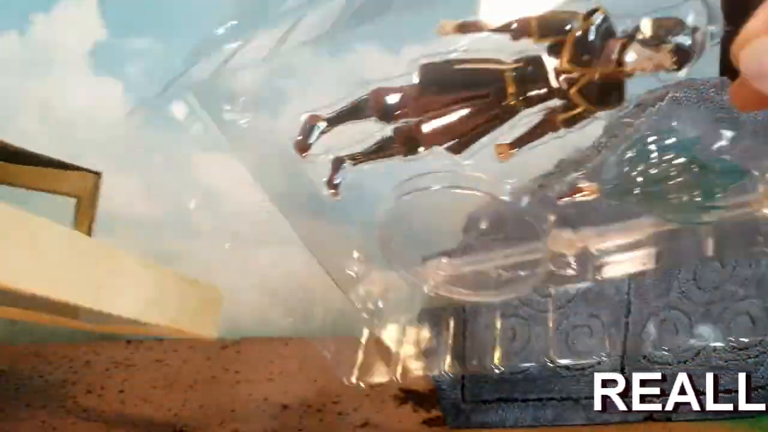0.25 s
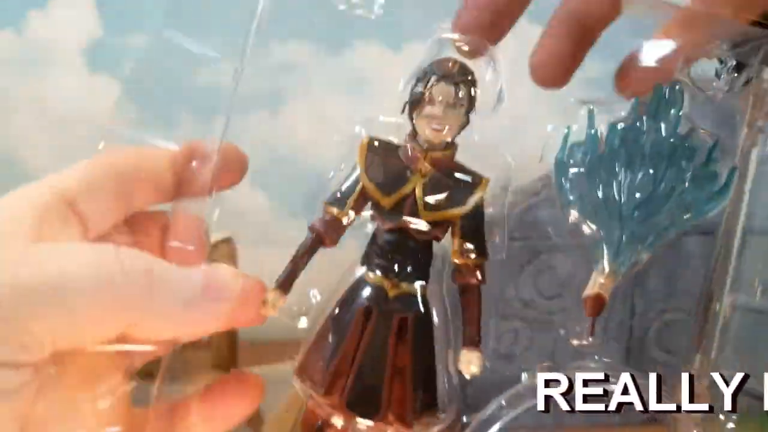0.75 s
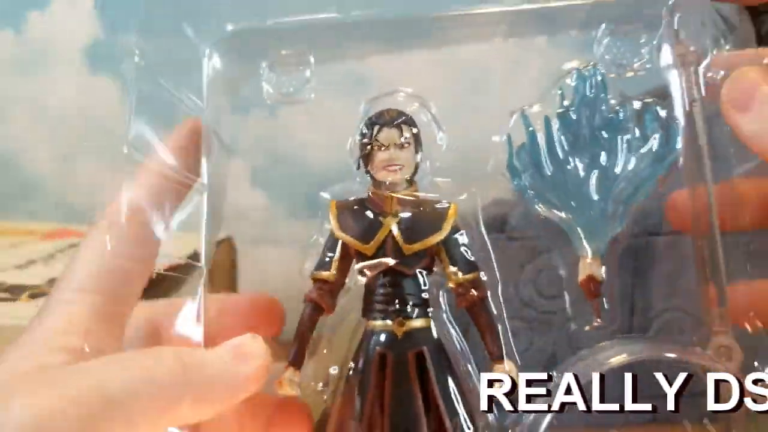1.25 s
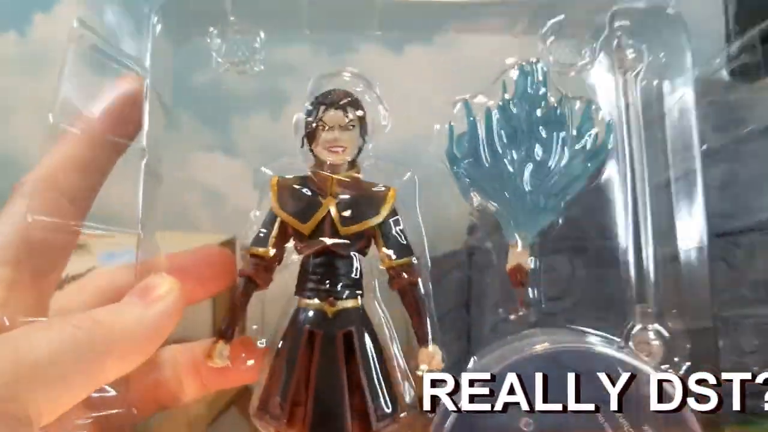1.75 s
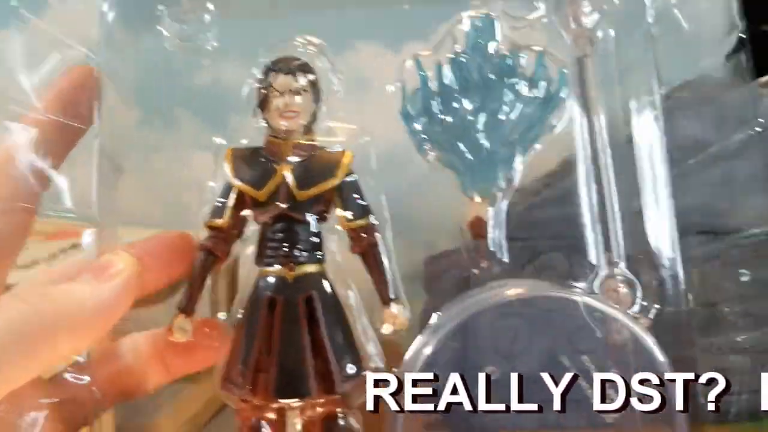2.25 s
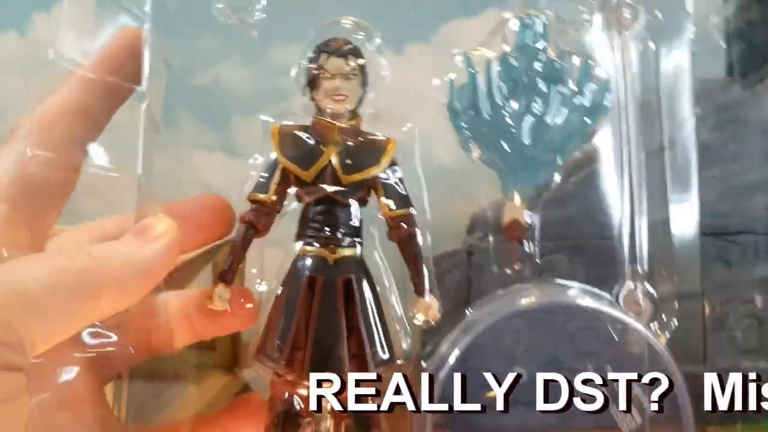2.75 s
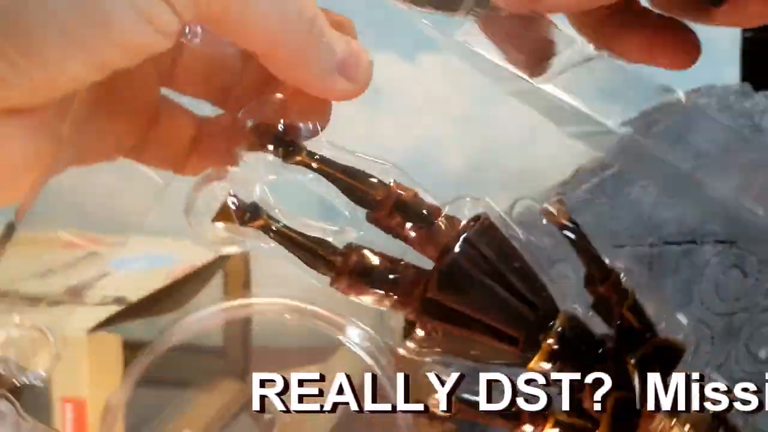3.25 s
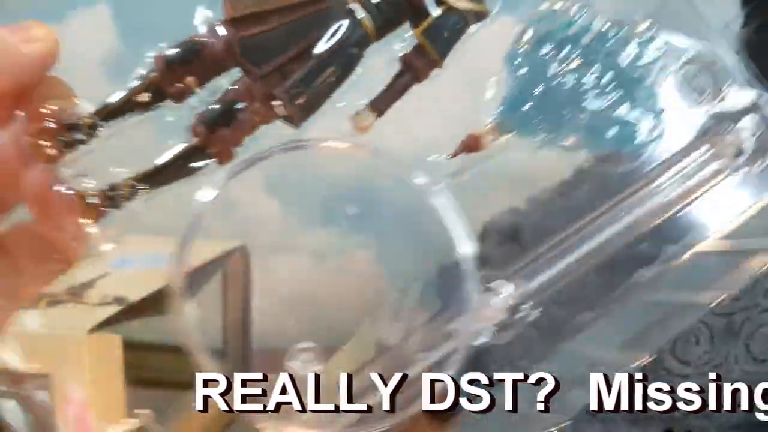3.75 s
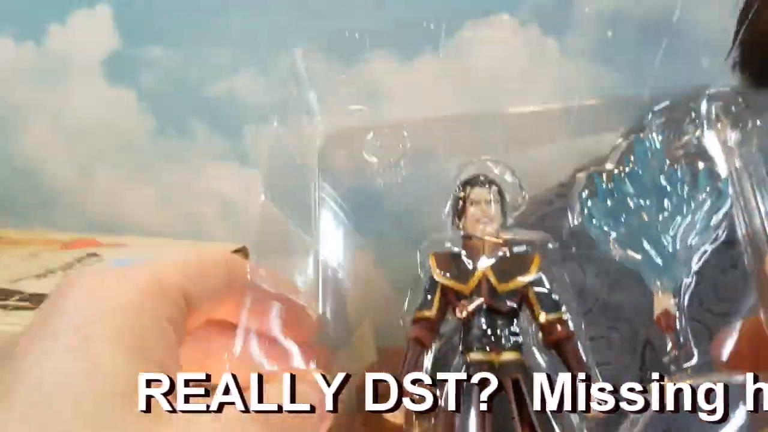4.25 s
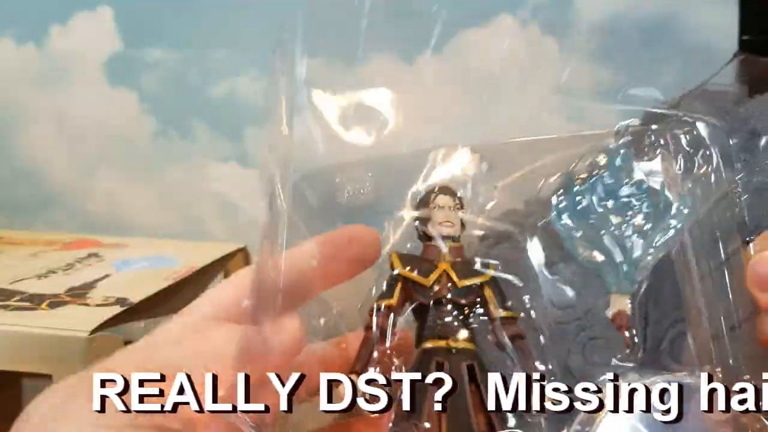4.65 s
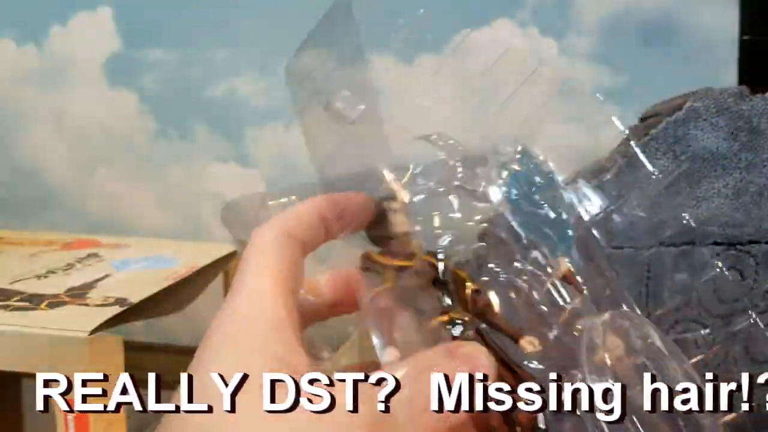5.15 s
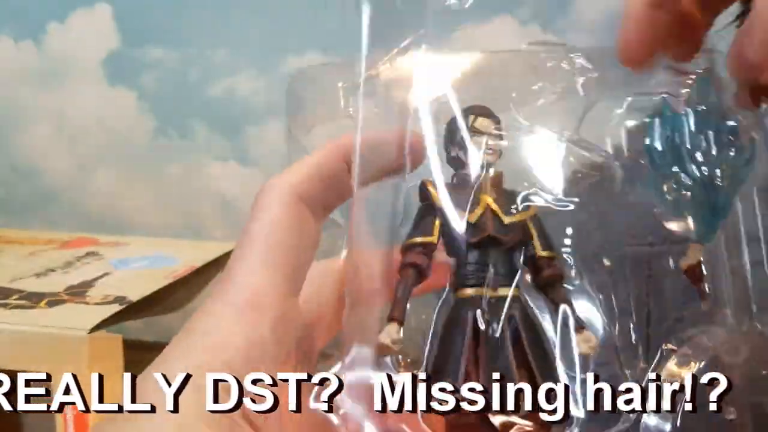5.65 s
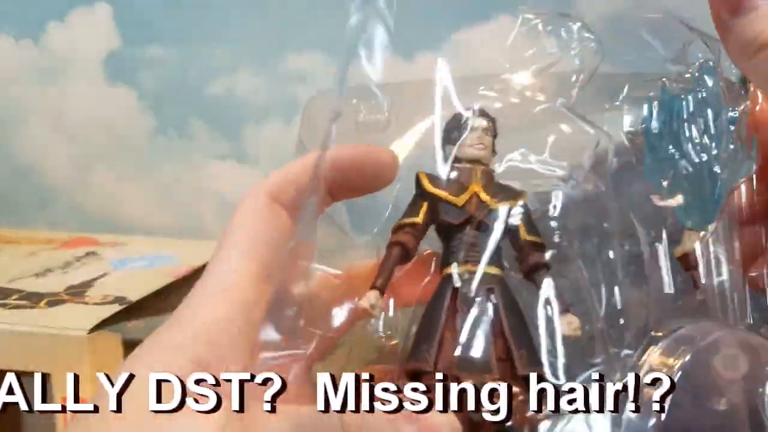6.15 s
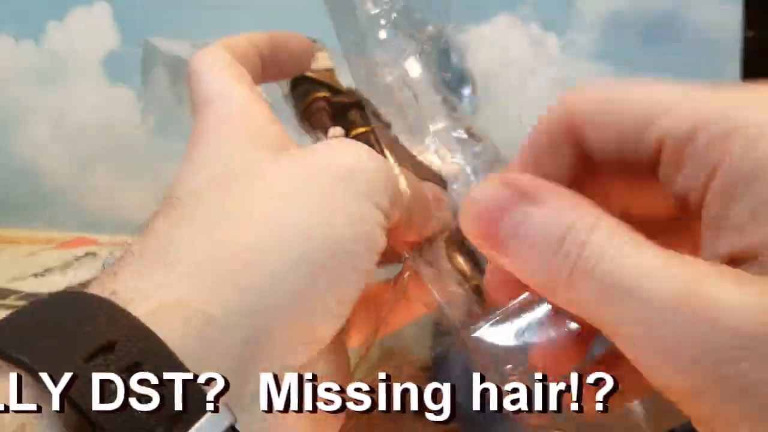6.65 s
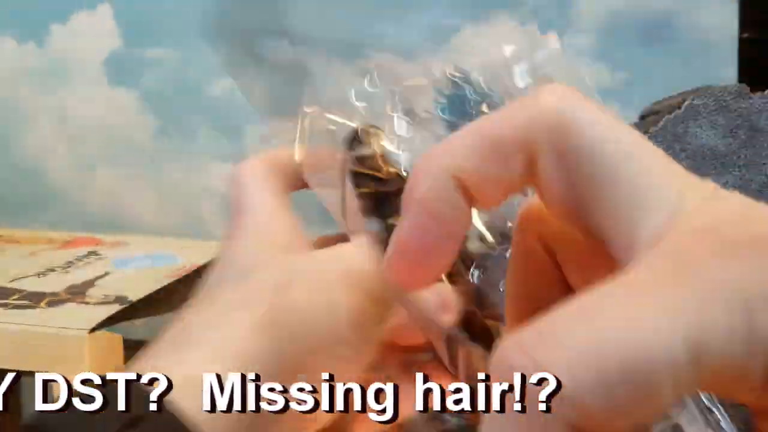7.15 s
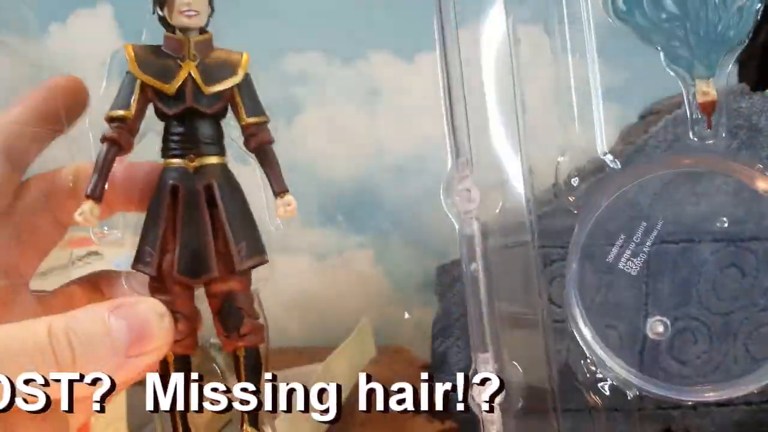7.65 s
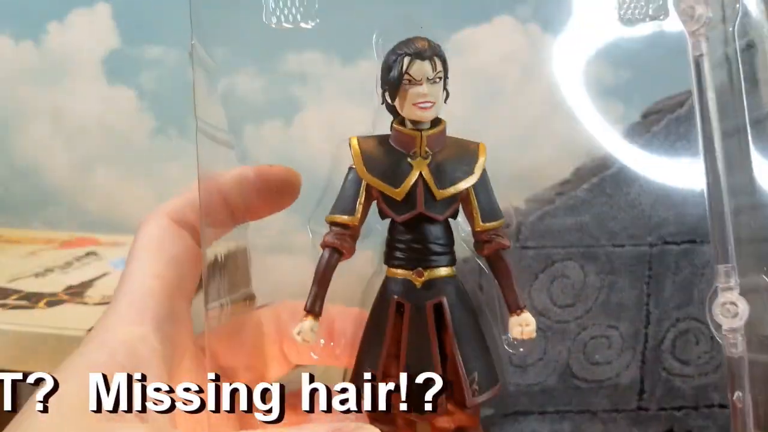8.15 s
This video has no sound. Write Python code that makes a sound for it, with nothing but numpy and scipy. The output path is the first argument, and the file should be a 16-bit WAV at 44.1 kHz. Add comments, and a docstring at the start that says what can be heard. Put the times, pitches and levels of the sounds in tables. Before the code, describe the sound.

Close, sharp snaps and dense crinkling from a thin plastic tray being bent and handled, with a fan humming softly behind.

```python
"""Flexing a plastic tray

Hands flex a clear moulded plastic tray close to a two-port microphone in a small room. Creases in the
stiff film buckle, and each impulse excites damped panel modes: sharp snaps over a bed of small crackles
and finger rub. A lid edge slips once in a run of jerks, and a finger slides near the end.
A fan hums behind, and the room answers briefly."""
import sys
import numpy as np
from scipy import signal
from scipy.fft import rfft, irfft, next_fast_len
from scipy.io import wavfile
from scipy.ndimage import uniform_filter1d, map_coordinates

SR = 44100
rng = np.random.default_rng(int(sys.argv[2]) if len(sys.argv) > 2 else 0)


def dump(signal):
    """Clip the signal to [-1, 1] and save it as 16-bit WAV at the path in sys.argv[1]."""
    limited = np.clip(np.atleast_2d(signal).T, -1, 1)
    pcm = np.round(limited * 32767).astype(np.int16)
    wavfile.write(sys.argv[1], SR, pcm)


N = 370440

# Wavering level of the fan: time_s, level_db
FAN_LEVEL = [(0.0, -42.5), (2.15, -41.5), (2.62, -47), (3.11, -42), (4.23, -43.5), (4.54, -40.5),
             (5.94, -44.5), (6.57, -50.5), (7.09, -44.5), (7.86, -45), (8.02, -42), (8.4, -40.5)]
# Relative noise spectra: frequency_hz, density_db
AIR_SPECTRUM = [(30, -27.5), (90, -28), (125, -10.5), (220, -14.5), (320, 3.5), (420, -10), (680, -21.5),
                (1100, -16.5), (1400, -25), (2400, -31.5), (3100, -26), (3800, -31.5), (4500, -28.5),
                (5700, -53), (7400, -36), (9700, -34), (12000, -31.5), (16000, -42)]  # fan air and microphone hiss
SKIN_SPECTRUM = [(400, -14), (1000, 1), (2200, -13.5), (4500, -13.5), (14000, -21)]  # smooth rubbing
SMALL_PANEL_SPECTRUM = [(500, -71), (1200, -19), (1650, -4), (2300, -4), (3500, 0), (5000, -5.5),
                        (7000, -18)]
LARGE_PANEL_SPECTRUM = [(120, -13), (250, 5.5), (500, -2.5), (1000, 3), (1400, -5.5), (2500, -35.5)]
CREASE_SPECTRUM = [(3000, -77), (5000, -14), (6500, 1.5), (9000, 0), (11000, -4.5), (15000, -6.5),
                   (16500, -12)]
# Likeness of the left and right channels: frequency_hz, correlation
AIR_COHERENCE = [(60, 0.87), (240, 1), (950, 0.96), (3770, 0.1), (15000, 0.0092)]
FILM_COHERENCE = [(60, 0.85), (240, 0.84), (950, 1), (3770, 0.72), (15000, 0.0057)]
# Reverberation time of the room: frequency_hz, t60_s
ROOM_DECAY = [(300, 0.028), (2000, 0.1), (10000, 0.016)]
# A finger sliding on the tray: time_s, level_db
SLIDE_LEVEL = [(7.86, -75), (7.885, -46), (7.96, -36.5), (8.01, -49), (8.05, -99)]
# Bursts of crackle, one per flex; the last two columns are relative to the small panels:
# start_s, length_s, level_db, crease_db, large_panel_db
FLEXES = [(0, 0.039, -41, -2, 0), (0.062, 0.078, -37, -4.5, 3.5), (0.239, 0.12, -47, 2.5, 3.5),
          (0.398, 0.1, -41.5, -7.5, 1), (0.542, 0.044, -34, -5, -0.5), (0.664, 0.077, -37, -8, -5),
          (0.741, 0.33, -44, -5.5, -2.5), (1.139, 0.053, -40.5, -3.5, -4.5), (1.221, 0.06, -36, -8, -3),
          (1.331, 0.12, -35, -4.5, -7), (1.526, 0.22, -40, -5.5, -2.5), (1.844, 0.056, -55, 8.5, 5),
          (2.11, 0.097, -65, 26, 9), (2.228, 0.0099, -60.5, 24, -14), (2.354, 0.086, -44, -4, -4.5),
          (2.513, 0.23, -51, 2.5, -1), (2.81, 0.093, -52.5, -13, 5.5), (2.886, 0.12, -35, -1.5, 1.5),
          (3.043, 0.11, -39, -3.5, 0), (3.146, 0.045, -35, 0.5, 4.5), (3.218, .12, -42.5, -8.5, 2),
          (3.438, 0.021, -31, -6, 0), (3.52, 0.13, -47.5, -5, -2.5), (3.713, 0.014, -45, -9, -3),
          (3.757, 0.031, -56, -1, 17), (3.873, 0.11, -34, -4.5, -1.5), (4.036, 0.2, -44.5, -3.5, -3.5),
          (4.307, 0.09, -37, -3, -3.5), (4.452, 0.1, -37, -3, -4), (4.578, 0.18, -37.5, -6.5, -6),
          (4.791, 0.23, -40, -8, -6.5), (5.042, 0.12, -31.5, -3.5, -10.5), (5.204, 0.31, -36.5, -5.5, -7.5),
          (5.548, 0.032, -36.5, -5, -2.5), (5.68, 0.092, -41.5, -6.5, 1), (5.792, 0.069, -30, -9, -4.5),
          (5.909, 0.25, -34, -4.5, -6), (6.182, 0.072, -31, -9, -7.5), (6.296, .2, -41, -5, -2.5),
          (6.611, 0.13, -46.5, -2.5, -8), (6.784, 0.08, -39.5, -0.5, -6.5),
          (6.932, 0.083, -34.5, -1, -11.5), (7.056, 0.15, -44.5, 0, -6), (7.196, 0.042, -30.5, -7, -8.5),
          (7.285, 0.016, -45.5, -7, 1), (7.33, 0.075, -52, -6, -3), (7.537, 0.046, -51, -4, 2)]
# Single buckling creases; thump and crack are gains within the snap:
# start_s, level_db, pitch_hz, thump_db, crack_hz, crack_db, left_over_right_db
SNAPS = [(0.0823, -17.5, 1020, -18, 5100, 1.5, 5), (0.123, -28, 1320, -13, 6450, -10, 0),
         (0.46, -25, 2500, -10, 4670, 0, 0), (0.485, -18.5, 1230, -6, 4610, -5, 2),
         (0.5154, -2.5, 2880, -8.5, 4460, -14, 3.5), (0.533, -22, 3350, -9, 6500, -6, 1.5),
         (0.56, -12.5, 1300, -3, 4770, -13, 3), (0.6614, -6.5, 1710, -24, 7350, -7, 2),
         (0.686, -15, 960, -18, 6700, -5, 0), (0.729, -24, 1520, -21, 4600, -2, 2.5),
         (0.745, -7.5, 1530, -27, 5860, 3, 3), (0.841, -32, 1180, -10, 5010, 6.5, 2.5),
         (0.912, -27, 1090, -15, 7100, 3, 5), (1.057, -29.5, 3510, -18, 4920, 6.5, 2.5),
         (1.0877, -39, 840, -13, 7500, 10, 3), (1.157, -19.5, 2570, -15, 4510, -3, 2),
         (1.213, -11, 2570, -25, 5910, -15, 1.5), (1.225, -15.5, 1020, -20, 5260, -12, 3),
         (1.269, -11.5, 3450, -22, 6500, -3, 2), (1.2733, -10, 915, -8, 5110, 0.5, 6),
         (1.278, -7.5, 860, -24, 4630, -0.5, 2), (1.4227, -21, 4200, -10, 6960, -2, 8),
         (1.693, -25, 700, -12, 5030, 0, 5), (1.768, -30.5, 950, -19, 5120, 8, 5),
         (1.843, -35, 620, -6, 6000, 0, 3), (1.935, -37, 2500, -8, 5510, -8, 7),
         (1.987, -36, 1060, -8, 4880, -2, 5), (2.229, -32.5, 610, -5, 9400, 11, -16),
         (2.341, -6, 810, -23, 6960, -4, 5), (2.406, -30, 3970, -15, 5010, -2, 6),
         (2.415, -28, 3400, -14, 6160, -1, 3.5), (2.43, -27.5, 3400, -12, 4580, 0, 2.5),
         (2.5801, -11, 876, -19, 4520, -3.5, 1.5), (2.617, -26.5, 2420, -15, 6000, 1, 2.5),
         (2.713, -44, 1130, -8, 4990, 4, 7), (2.887, -26, 790, -3, 4690, -3, 0),
         (2.953, -13, 990, -1.5, 5220, 1, 1.5), (2.982, -8.5, 1040, -10, 5750, -1, 0),
         (3.1482, -17.5, 3330, -10, 4660, 8, 4), (3.197, -15, 650, -7, 4600, -16, 1),
         (3.235, -17.5, 930, -8, 5590, -4, 2), (3.278, -15.5, 3430, -24, 5880, -6, -3),
         (3.361, -29.5, 3520, -12, 5350, 1, 6), (3.437, -13, 3360, -20, 5550, -16, 6),
         (3.4535, -0.5, 940, -15, 5100, -4, 3.5), (3.537, -26, 3130, 2, 5250, -7, 7),
         (3.5577, -18, 740, -19, 5770, -8, 6), (3.596, -30.5, 3750, -12, 4630, 5.5, 4.5),
         (3.669, -30, 1010, -16, 4800, -7, 8), (3.881, -12.5, 945, -21, 4660, -14, 2),
         (3.918, -11, 3720, -17, 5100, 4.5, 4), (3.9846, -14.5, 1680, -11.5, 6860, -11, 1),
         (4.0545, -22, 3540, -23, 4560, -2, 3), (4.0748, -27.5, 970, -21, 7520, 8.5, 3),
         (4.1635, -12.5, 3770, -21, 6050, -11, 2.5), (4.2017, -34, 3520, -12, 4510, 8, 1),
         (4.328, -18.5, 1080, -11, 4660, 1, 0), (4.455, -20, 2520, -16, 5500, -6, 0),
         (4.4666, -8, 1490, -8, 5250, -4, 0), (4.5157, -2, 1990, -12, 5800, -3, 0.5),
         (4.582, -18, 1070, -13, 4530, -7, 1.5), (4.6085, -14, 1250, -26, 4680, -14, 0.5),
         (4.6714, -11.5, 3570, -28, 7000, 1.5, 3), (4.7003, -12, 990, -11, 5050, -3, 3),
         (4.747, -23, 1640, -5, 4590, 1, 1.5), (4.78, -18, 3640, -9, 4620, -11, 0),
         (4.8072, -28, 4500, -9, 6000, 4, 2), (4.816, -37, 3240, -12, 5500, 1, 1.5),
         (4.835, -22, 1890, -17, 7630, 5, 2), (4.9065, -38, 3620, -18, 5050, -5, 1),
         (4.9205, -14, 2030, -18, 4830, -11, 3), (4.944, -19, 940, -7, 5980, -10, 1),
         (5.0474, -19.5, 3020, -24, 6540, -3, 1), (5.0815, -6.5, 1750, -35, 5540, 2, 4.5),
         (5.129, -14, 1970, -28, 5000, -2, 0), (5.1577, -24, 3460, -24, 4540, -2, 3),
         (5.2005, -17.5, 1630, -13, 4530, -11, -3), (5.282, -13.5, 2140, -24, 4500, -16, -6),
         (5.3831, -7.5, 2260, -32, 7100, 2.5, 0), (5.414, -23, 3470, -18, 5490, -2, -5),
         (5.4328, -12.5, 3640, -29, 4550, -18, 3), (5.546, -23, 3950, -13, 4590, 0, 0),
         (5.565, -1.5, 1790, -41, 4700, -5.5, 2.5), (5.579, -18.5, 2530, -18, 6900, 12, 2),
         (5.596, -11, 3700, -10, 5920, -1, -5), (5.71, -24, 1010, -10, 4700, -14, -6),
         (5.739, -23, 767, -15, 5160, 4.5, -6), (5.779, -24, 4020, -16, 11600, 3, 0),
         (5.798, -14, 935, -16, 4890, -11, -1), (5.804, -15, 3800, -20, 7420, -1, 0),
         (5.813, -17, 4100, -25, 4530, -5, 1), (5.8408, -21, 1980, -23, 8700, 5, 1.5),
         (5.846, -13.5, 3590, -24, 4630, -11, -1), (5.875, -22, 3700, -16, 4640, -4, -1.5),
         (5.917, -7, 4100, -15, 8350, -8, 4), (5.941, -19, 2800, -22, 4550, -3, -1),
         (6.034, -19, 3420, -14, 6500, -4, 3), (6.0467, -16, 4350, -21, 4500, -7, 2),
         (6.0527, -9, 2500, -23, 5690, -15, 2.5), (6.0699, -19.5, 1500, -20, 10900, 9, 1),
         (6.085, -11.5, 1570, -6, 5140, -3, 0.5), (6.1235, -23, 890, -14, 9000, 8, 0),
         (6.189, -9, 1020, -26, 6340, 5.5, -1.5), (6.203, -9, 3000, -30, 6000, 0, 2),
         (6.209, -11, 2300, -33, 4590, 0, -2), (6.232, -21, 1660, -22, 5490, 2, -3),
         (6.2454, -10, 2640, -31, 7380, -12, -1), (6.255, -14, 1690, -23, 5000, -14, 0),
         (6.275, -12, 3170, -28, 4900, 3, -2), (6.3709, -12.5, 1090, -11, 4660, -1.5, -4),
         (6.466, -19, 4420, -16, 4640, 3, 1), (6.684, -30, 3510, -24, 5980, -9, 8),
         (6.7685, -16.5, 3850, -31, 5150, 1, 6), (6.783, -32, 4130, -26, 10100, 11, 0),
         (6.79, -14, 1120, -31, 6430, 12.5, 5.5), (6.812, -25.5, 3600, -20, 8000, 16, 1),
         (6.8277, -21, 1940, -24, 10400, 11.5, 5), (6.835, -21, 3450, -20, 4760, -1, 9),
         (6.857, -21, 3440, -7, 4520, -3, 7), (6.946, -15.5, 3600, -33, 6440, 8, 6),
         (6.9654, -12, 1600, -25, 7160, -3, 9.5), (6.9947, -16, 3500, -30, 7300, 2, 10),
         (7.051, -28, 2550, -14, 6650, 8, 6), (7.0642, -19.5, 3500, -24, 11200, 10, 7),
         (7.0849, -20, 3880, -30, 6900, 6.5, 3), (7.128, -6, 3400, -30, 9100, 5, 5),
         (7.159, -22, 2000, -12, 8280, 3, -1), (7.1991, -10.5, 1600, -18, 8380, 6, 3),
         (7.2037, -6.5, 2170, -22, 5810, 1.5, 0), (7.209, -11, 1610, -23, 8430, -7, 6),
         (7.2341, -9, 2210, -30, 6200, 0, 0), (7.240, -15, 2450, -28, 6780, 1, 2),
         (7.333, -30, 4200, -16, 11200, 11, 2), (7.3652, -23, 3370, -6, 7800, 2, -1),
         (7.375, -22.5, 1590, -18, 6000, -8, 7), (7.405, -27.5, 1090, -21, 4640, -18, 0),
         (7.999, -20.5, 1750, -9, 6360, -8.5, 2.5)]


def amp(db):
    """Decibels to amplitude ratio."""
    return 10 ** (np.asarray(db) / 20)


def unit(x):
    """Normalisation to an rms of 1."""
    return x / np.sqrt(np.mean(x ** 2) + 1e-20)


def decay(t, t60_s):
    """Exponential damping: 60 dB down after t60_s."""
    return amp(-60 * t / t60_s)


def attack(t, rise_s=0.0001):
    """First-order rise with time constant rise_s."""
    return 1 - np.exp(-t / rise_s)


def along(points, hz):
    """Interpolation of (frequency_hz, value) points on a logarithmic frequency axis."""
    f, v = np.transpose(points)
    return np.interp(np.log(hz + 1), np.log(f + 1), v)


def curves(rows):
    """Linear interpolation, to every sample, of each column after the time."""
    time_s, *columns = np.transpose(rows)
    return [np.interp(np.arange(N) / SR, time_s, column) for column in columns]


def wobble(rate):
    """A smooth random curve through rate knots a second."""
    knots = rng.standard_normal(int(N * rate / SR) + 4)
    return map_coordinates(knots, [np.arange(N) * rate / SR])


def filtered(x, response):
    """Filtering as multiplication of the spectrum by response(hz)."""
    size = next_fast_len(N + 8192)
    return irfft(rfft(x, size) * response(np.fft.rfftfreq(size, 1 / SR)), size)[..., :N]


def band(x, lo_hz, hi_hz):
    """Causal band-pass filter."""
    return signal.sosfilt(signal.butter(2, (lo_hz, hi_hz), "band", fs=SR, output="sos"), x)


def spread(pair, spectrum, coherence):
    """Partial coherence: two independent signals, coloured and mixed as mid and side; rms 1."""
    def response(hz):
        angle = np.arccos(np.clip(along(coherence, hz), -1, 1)) / 2
        return amp(along(spectrum, hz)) * [np.cos(angle), np.sin(angle)]
    mid, side = filtered(pair, response)
    return unit(np.array([mid + side, mid - side]))


def fan(motor_hz=480):
    """Broadband air noise with a hump near 320 Hz, plus one faint, wavering motor tone."""
    level_db, = curves(FAN_LEVEL)
    air = spread(rng.standard_normal((2, N)), AIR_SPECTRUM, AIR_COHERENCE)
    phase = 2 * np.pi * motor_hz * np.arange(N) / SR + 0.5 * wobble(5)
    motor = amp(-10 + 1.5 * wobble(6)) * np.sin(phase)
    return amp(level_db) * (air + motor)


def room(x):
    """Reverberation: convolution with a noise tail in which each frequency decays at its own rate."""
    hz, t, spectra = signal.stft(rng.standard_normal((2, SR // 4)), SR, nperseg=128)
    tail = signal.istft(spectra * decay(t, along(ROOM_DECAY, hz)[:, None]), SR, nperseg=128)[1]
    delayed = np.pad(x, ((0, 0), (80, 0)))  # reflections arrive 1.8 ms late
    return signal.fftconvolve(delayed, tail / np.linalg.norm(tail[0]), axes=1)[:, :N]


def finger_slide():
    """Sliding friction: skin on smooth film gives an even hiss, strongest near 1 kHz."""
    level_db, = curves(SLIDE_LEVEL)
    return amp(level_db) * spread(rng.standard_normal((2, N)), SKIN_SPECTRUM, FILM_COHERENCE)


def lid_slips(start_s=1.319, mean_gap_s=0.0048, count=12):
    """Stick-slip friction: a lid edge moves in jerks, each a bright tick of a few milliseconds."""
    jerks, t = np.zeros(N), np.arange(SR // 100) / SR
    for k, (jitter, size) in enumerate(rng.standard_normal((count, 2))):
        onset = round((start_s + mean_gap_s * (k + 0.25 * jitter)) * SR)
        jerks[onset:][:len(t)] += amp(-17 + 3.6 * size) * decay(t, 0.0059)
    return band(jerks * rng.standard_normal((2, N)), lo_hz=2210, hi_hz=10100)


def handling(rise_db_per_s=1095, fall_db_per_s=344):
    """Incoherent addition: flex powers sum to a level and weight the crease and large-panel gains."""
    t = np.arange(0, N, 32) / SR
    start_s, length_s, level_db, *colours_db = np.transpose(FLEXES)[..., None]
    rise_db = rise_db_per_s * (start_s - t).clip(0)
    fall_db = fall_db_per_s * (t - start_s - length_s).clip(0)
    power = amp(level_db - rise_db - fall_db).clip(amp(-150)) ** 2
    rest_power, rest_colours_db = amp(-63) ** 2, (-8.5, 7)  # a tray that is only held barely stirs
    total = rest_power + power.sum(axis=0)
    mixed_db = [(rest_power * rest_db + (power * flex_db).sum(axis=0)) / total
                for rest_db, flex_db in zip(rest_colours_db, colours_db)]
    return curves(np.transpose([t, 10 * np.log10(total), *mixed_db]))


def shifting_resonances(x, depth_db):
    """Bending shifts the film's resonances, modelled as a random gain over time and frequency."""
    spectra = signal.stft(x, nperseg=256)[2]
    field = uniform_filter1d(rng.standard_normal(spectra.shape[1:]), size=4, axis=0)
    field = uniform_filter1d(field, size=12, axis=1)
    return signal.istft(spectra * amp(depth_db * unit(field)), nperseg=256)[1][:, :N]


def crackle():
    """Crackling noise: many small buckles of widely scattered size come in clumps, over finger rub."""
    level_db, crease_db, large_panel_db = handling()
    clumps = np.exp(0.35 * wobble(40))
    pops_per_s = 300 * amp(0.35 * (level_db + 41)) * clumps  # harder handling buckles more creases
    pops = (rng.random(N) < pops_per_s / SR) * amp(4.5 * rng.exponential(size=N).clip(0, 1.8))
    grip_db = 0.21 * (level_db + 38)  # a firmer grip rubs more; a light one leaves dry ticks
    rub = amp(-6 + grip_db + 4.3 * wobble(70))
    noise = shifting_resonances(rng.standard_normal((2, N)), depth_db=3.5)
    t = np.arange(SR // 50) / SR

    def layer(spectrum, t60_s):
        kicks = pops * amp(rng.normal(0, 3.5, N))  # every buckle has its own colour
        bursts = unit(signal.fftconvolve(kicks, decay(t, t60_s) * attack(t))[:N])
        drive = np.hypot(bursts, rub)
        local_power = np.abs(uniform_filter1d(drive ** 2, size=3000))
        drive /= local_power ** 0.4  # evened out, so that the hands set the energy spent
        return spread(drive * noise, spectrum, FILM_COHERENCE)

    small_panels = layer(SMALL_PANEL_SPECTRUM, t60_s=0.007)
    creases = amp(crease_db) * layer(CREASE_SPECTRUM, t60_s=0.0045)
    large_panels = amp(large_panel_db) * layer(LARGE_PANEL_SPECTRUM, t60_s=0.012)
    lean = amp([[0.7], [-0.7]])  # the tray is held a little to the left
    treble_lean = amp([[0.6], [-0.6]])  # treble is more directional
    return lean * amp(level_db) * (small_panels + treble_lean * creases + large_panels)


def panel_ring(t, pitch_hz):
    """Impulse response of a panel and 18 neighbouring modes; higher panels are damped sooner."""
    t60_s = 0.022 * (pitch_hz / 1000) ** -0.15
    scatter = (np.arange(18)[:, None] + rng.random((18, 1))) / 18 - 0.5
    neighbour_hz = np.sqrt(pitch_hz * 2200) * np.exp(2.1 * scatter)
    neighbours = np.sin(2 * np.pi * (neighbour_hz * t + 0.62 * rng.random((18, 1)))).sum(axis=0)
    modes = 0.35 * np.sin(2 * np.pi * pitch_hz * t) + 0.11 * neighbours
    blow = 1 + 0.73 * decay(t, 0.0013)  # the buckle itself is hard and brief
    return modes * blow * decay(t, t60_s) * attack(t)


def tray_thump(t):
    """Damped free vibration of two low modes of the tray."""
    modes_hz = rng.uniform((190, 380), (330, 560))[:, None]
    return np.sin(2 * np.pi * modes_hz * t).sum(axis=0) * decay(t, 0.031) * attack(t, 0.0033)


def crease_crack(t, crack_hz):
    """A brief blow has a broad spectrum: a burst of treble noise, then a weaker fizz."""
    noise = rng.standard_normal((3, len(t)))
    peak = band(noise, lo_hz=0.86 * crack_hz, hi_hz=min(1.3 * crack_hz, 16000))
    shared, *separate = peak + 0.4 * band(noise, lo_hz=4000, hi_hz=15500)
    lag = rng.choice((-2, -1, 2, 2))  # samples between arrivals at the two ports
    hiss = unit(np.array([shared, np.roll(shared, lag)]) + 0.48 * np.array(separate))
    blow, fizz = decay(t, 0.0045), amp(-14) * decay(t, 0.03)
    return hiss * (blow + fizz) * attack(t)


def snaps():
    """Snap-through buckling: each crease rings its panel, thumps the tray and cracks in the treble."""
    out, t = np.zeros((2, N + SR)), np.arange(SR // 20) / SR
    for start_s, level_db, pitch_hz, thump_db, crack_hz, crack_db, left_over_right_db in SNAPS:
        ring = panel_ring(t, pitch_hz)
        thump = amp(thump_db) * tray_thump(t)
        crack = amp(crack_db) * crease_crack(t, crack_hz)
        pan = amp([[left_over_right_db / 2], [-left_over_right_db / 2]])
        out[:, round(start_s * SR):][:, :len(t)] += amp(level_db) * pan * (ring + thump + crack)
    return out[:, :N]


def scene():
    """Superposition of the tray's direct sound, its reverberation and the fan."""
    tray = snaps() + lid_slips() + crackle() + finger_slide()
    direct = band(tray, lo_hz=126, hi_hz=15600)  # the tray's sound is cut below about 126 Hz and above 15.6 kHz
    return direct + amp(-17.5) * room(direct.mean(axis=0)[None]) + fan()


def record(dry):
    """Saturation and band limiting: peaks clip softly at full scale, and the treble ends at 16 kHz."""
    clipped = dry / (1 + np.abs(dry) ** 16) ** (1 / 16)
    return filtered(clipped, lambda hz: hz < 16000)


dry = scene()
out = record(dry)
dump(out)
```